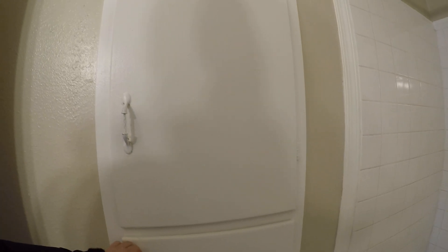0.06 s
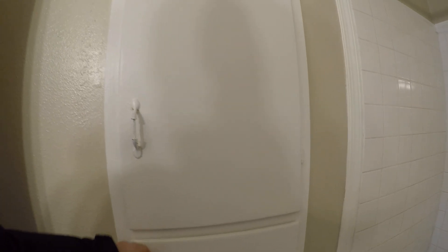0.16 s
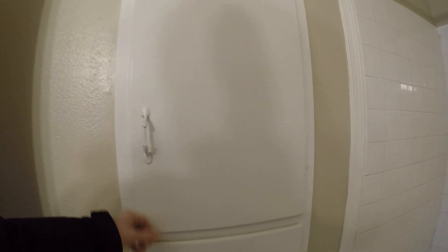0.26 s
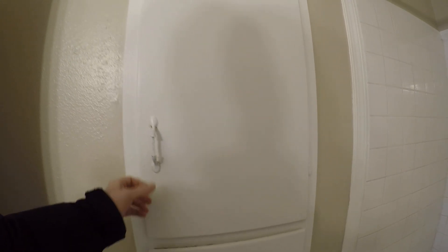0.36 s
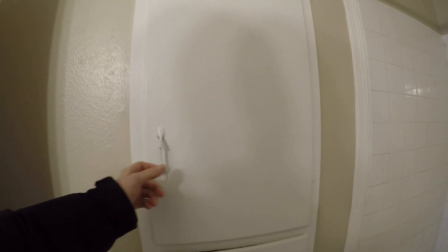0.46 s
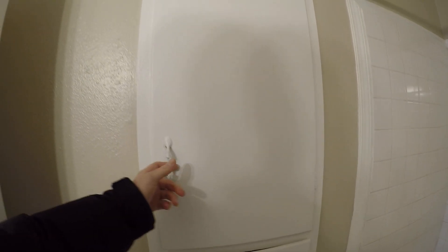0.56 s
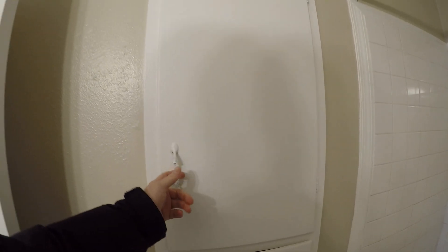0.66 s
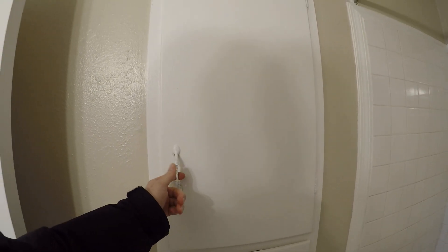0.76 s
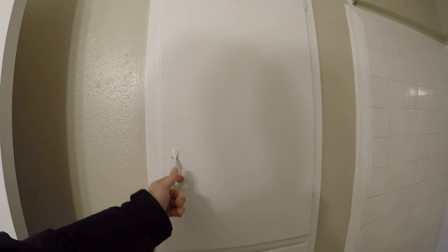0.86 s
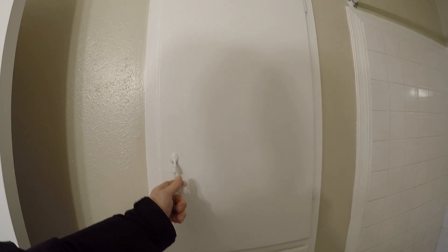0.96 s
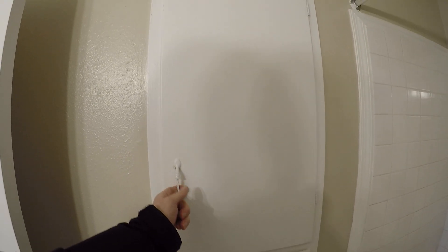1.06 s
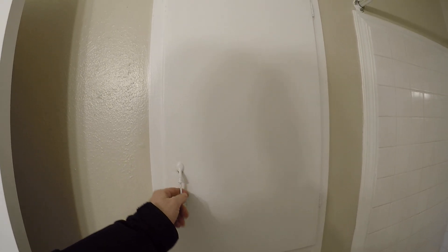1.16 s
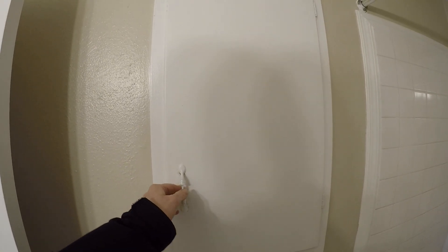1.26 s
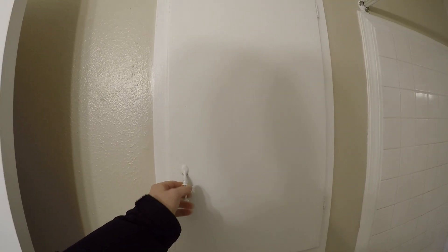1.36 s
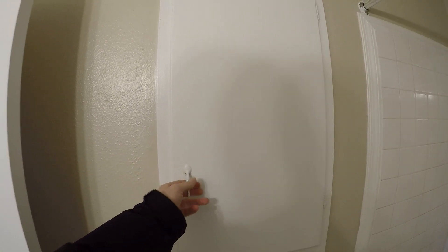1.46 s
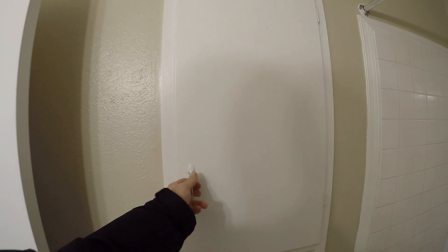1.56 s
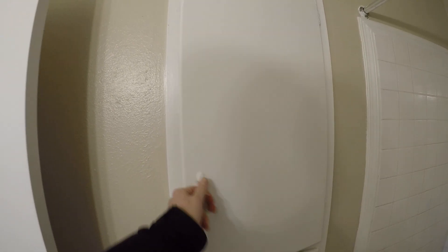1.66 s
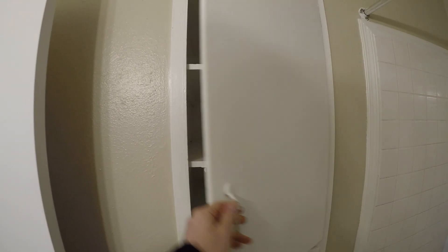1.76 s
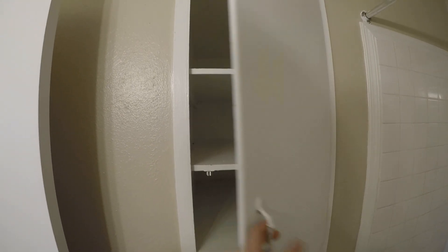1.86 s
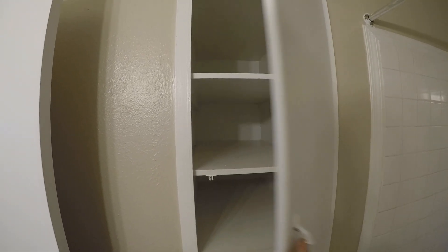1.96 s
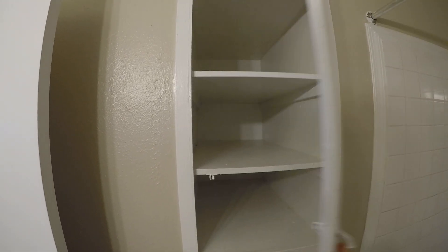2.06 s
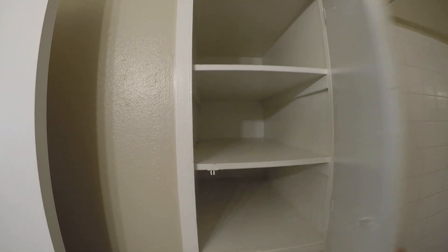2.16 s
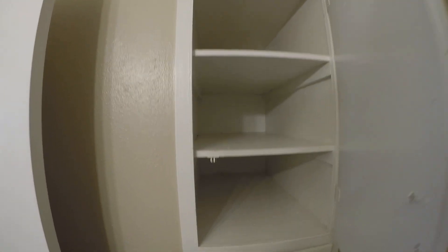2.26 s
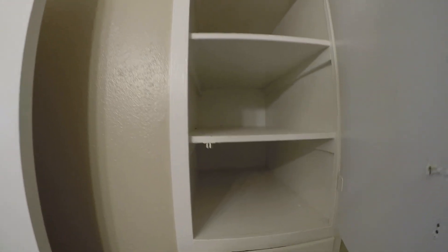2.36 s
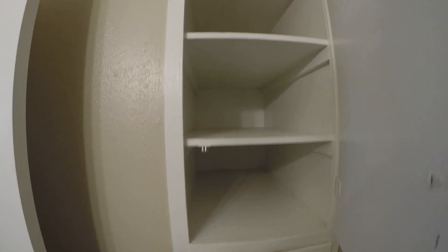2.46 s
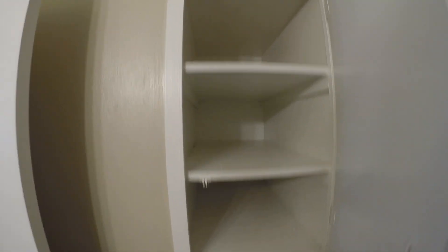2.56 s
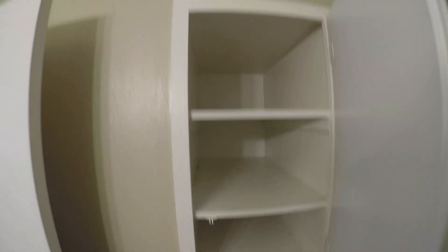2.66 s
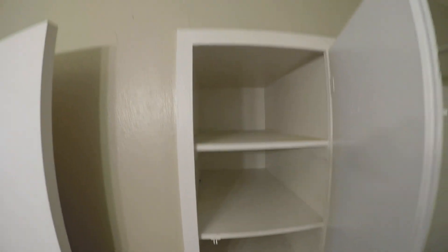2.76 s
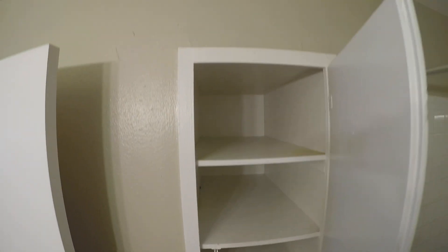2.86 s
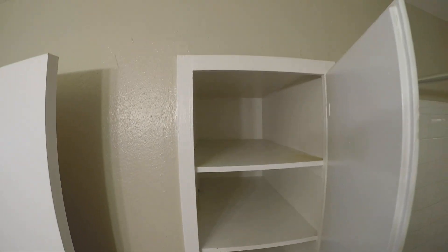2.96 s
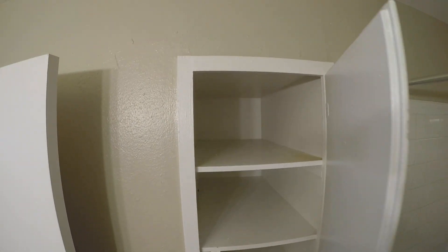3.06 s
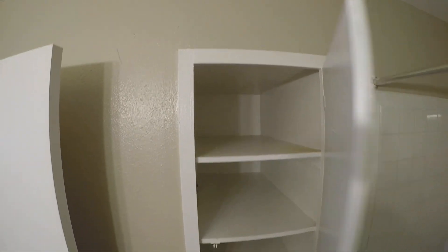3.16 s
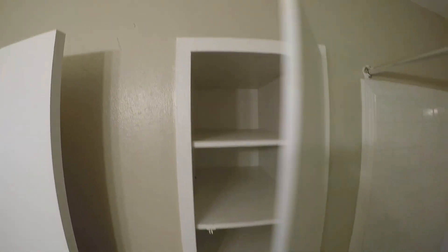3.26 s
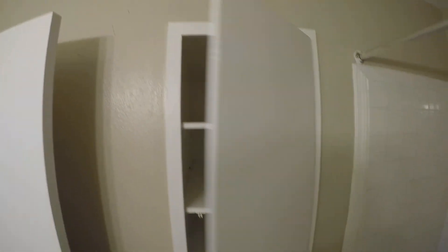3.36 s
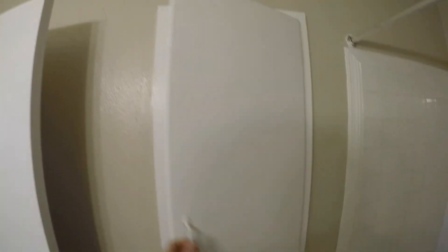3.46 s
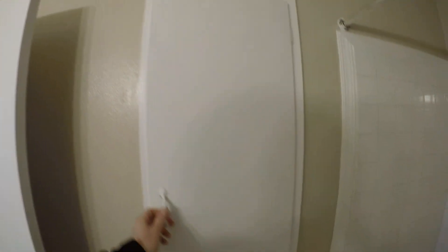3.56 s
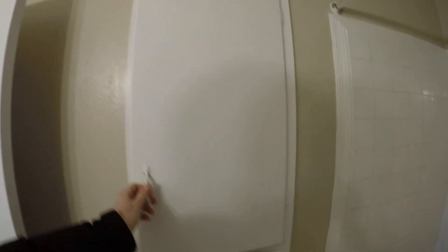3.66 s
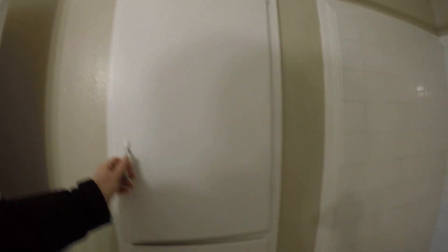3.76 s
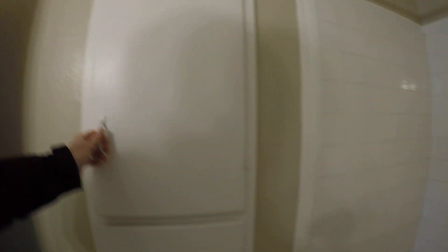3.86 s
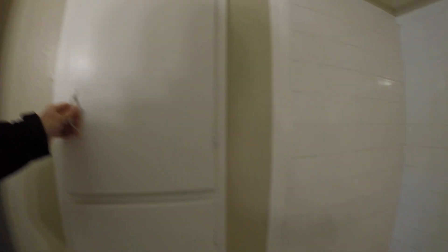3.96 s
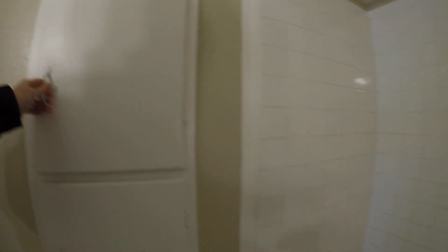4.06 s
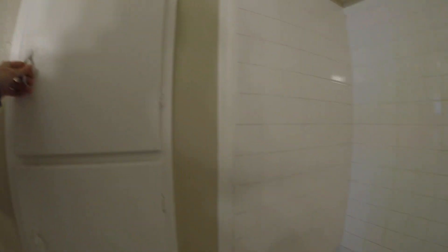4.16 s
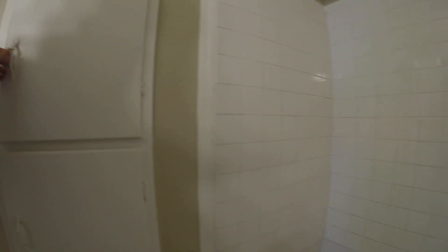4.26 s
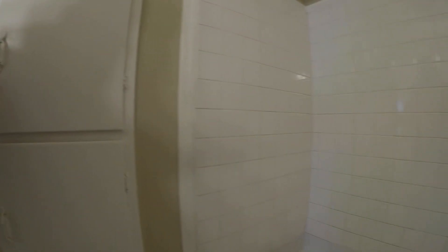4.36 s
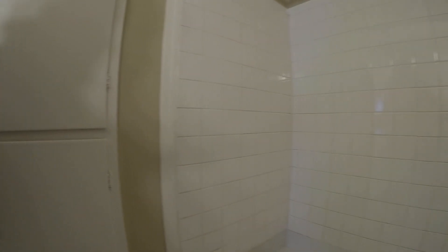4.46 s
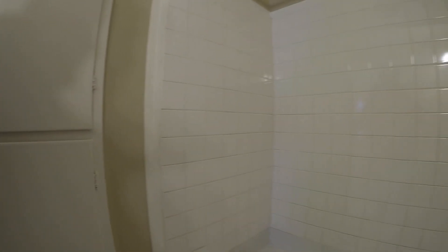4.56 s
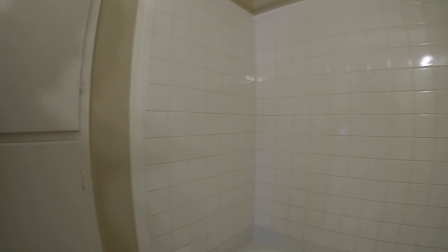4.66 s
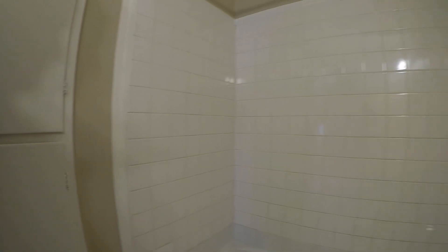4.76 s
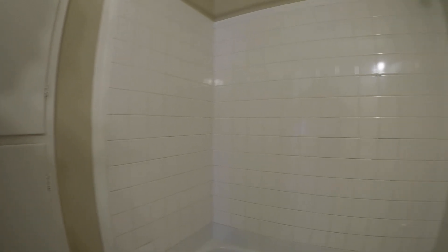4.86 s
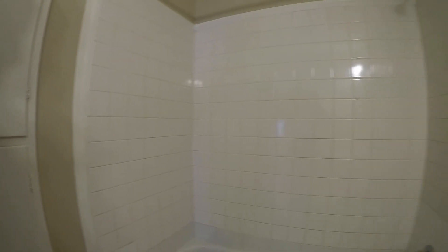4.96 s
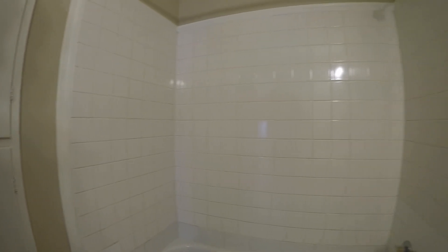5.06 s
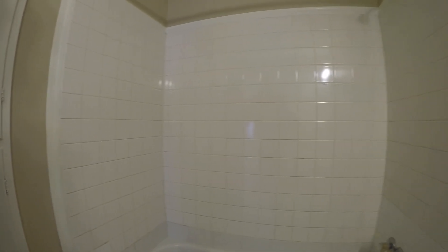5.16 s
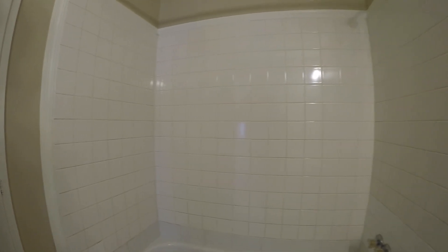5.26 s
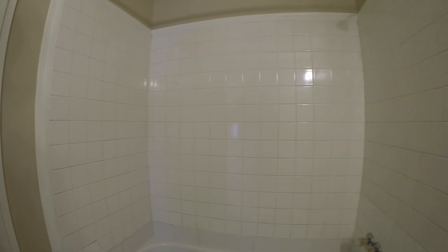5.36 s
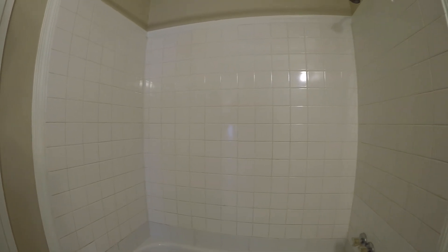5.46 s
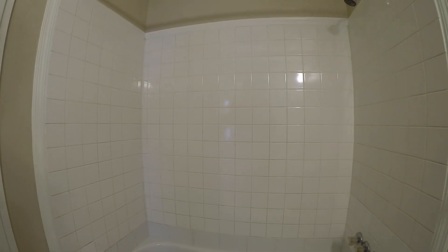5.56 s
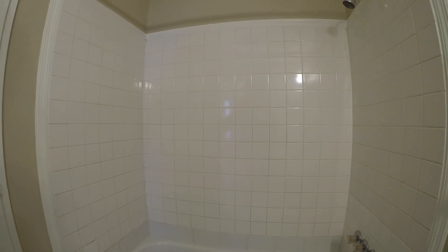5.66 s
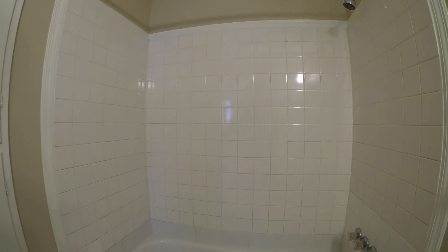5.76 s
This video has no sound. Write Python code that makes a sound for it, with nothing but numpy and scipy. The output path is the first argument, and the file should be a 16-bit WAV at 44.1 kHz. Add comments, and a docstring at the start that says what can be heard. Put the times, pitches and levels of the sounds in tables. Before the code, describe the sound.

A tight cabinet door is fumbled, snaps open, then shuts with a hollow wooden knock; footsteps thud in a small tiled bathroom.

```python
"""In a small tiled bathroom, a hand takes the handle of a painted wooden cabinet door and the tight catch snaps free.
The door swings open, is pushed shut with a hollow knock and settles in its catch. Struck bodies are sums of decaying
modes, each blow smoothed by its contact time; tile reflections, friction and rustle are coloured noise. Steps thud
on the floor, a sleeve rustles, and a body-worn camera ticks and rumbles as it moves, over faint room noise and a whine.
"""
import sys
import numpy as np
from scipy import signal
from scipy.fft import rfft, irfft
from scipy.io import wavfile

SR = 44100
rng = np.random.default_rng(int(sys.argv[2]) if len(sys.argv) > 2 else 0)


def dump_mix(stems):
    """Bounce the given channels to the path in sys.argv[1] as a 16-bit WAV at rate SR."""
    frames = np.atleast_2d(stems).T  # one column per channel
    limited = np.clip(frames, -1, 1)  # hard clip at full scale
    pcm = np.round(limited * 32767).astype(np.int16)
    wavfile.write(sys.argv[1], SR, pcm)


N = 256220  # length in samples
RING = np.arange(int(1.5 * SR)) / SR  # time axis of one struck sound, s

# All levels are relative gains in dB.
# Blows on the door: start_s, panel_thump_db, contact_ms, wood_clack_db, metal_catch_db
DOOR_BLOWS = [(1.565, -16.5, 1.85, -30, -38), (1.572, -22.5, 2.43, -58, -20.5), (1.586, -31, 2.9, -58, -22),
              (1.600, -23.5, 1.75, -43, -38), (1.619, -40.5, 0.62, -29.5, -57),
              (3.861, -34, 3.8, -52, -40.5), (3.912, -16.5, 2.86, -36.5, -47),
              (3.918, -24.5, 2.7, -33.5, -49), (3.932, -22, 3.4, -36, -53), (4.059, -53, 3.5, -38, -48)]
# Modes of the door panel and cabinet box: pitch_hz, level_db, t60_s
PANEL_MODES = [(27.54, 3.5, 2.38), (42.6, -4, 1), (71.7, 11, 0.41), (119.3, 6.5, 0.33), (145, 0, .58),
               (233, -1.5, .42), (280.7, -12.5, 0.72), (381, -7, 0.38), (408.2, -4, 0.393)]
# Modes of the door edge and frame: pitch_hz, level_db, t60_s
FRAME_MODES = [(626, -14.5, 0.52), (770, -8.5, 0.28), (830, -26, 0.28), (1650, -32, 0.24),
               (2020, -11, 0.39)]
# Modes of the metal catch: pitch_hz, level_db, t60_s
CATCH_MODES = [(1448, -11, .22), (1553, -15, .2), (2250, -16, .18)]
# Dense resonances of the box: pitch_hz, level_db
BOX_SPECTRUM = [(30, -16), (90, -15.5), (240, 2.5), (420, -11.5), (560, -32), (1000, -54)]
# Dense resonances of the wood: pitch_hz, level_db
WOOD_SPECTRUM = [(200, 15), (420, 8), (560, -4), (680, 8.5), (860, 13), (1100, -1), (1500, 9.5),
                 (2200, 2.5), (3200, -5), (6000, -9), (7500, -76), (11000, -54), (15000, -82)]
# Dense resonances of the metal: pitch_hz, level_db
METAL_SPECTRUM = [(400, -39), (1100, -10.5), (1500, 0.5), (2200, -3.5), (2900, -4), (4000, 2), (5000, 0),
                  (5900, 3), (6600, -2), (7400, -13), (8600, -12.5), (9800, -36), (12300, -22),
                  (15500, -54)]
# Click of the hinge: pitch_hz, level_db
HINGE_SPECTRUM = [(500, -2), (1500, 2.5), (3000, -17), (4500, 2), (6200, 6), (7500, -25), (15000, -30)]
SNAP_S, SNAP_DB = 1.5725, -27  # the catch lets go
HINGE_S, HINGE_DB = 2.467, -39  # the hinge clicks once when wide open

# Fingers on the handle: start_s, door_bump_db, metal_clink_db, sharp_tick_db
GRIPS = [(0.8006, -27.5, -39.5, -36), (0.811, -21, -53, -45), (0.95, -36, -56, -51),
         (1.21, -32.5, -66, -75), (1.232, -33, -52, -76), (1.252, -39, -58, -70)]
# Modes of the bumped door: pitch_hz, level_db, t60_s
BUMP_MODES = [(90.6, 1.5, 0.24), (115.4, 9, 0.09), (168, -3, 0.31), (219, -7.5, 0.51), (309, -17.5, 0.48),
              (400, -10.5, 0.17)]
# Modes of the handle: pitch_hz, level_db, t60_s
HANDLE_MODES = [(1990, -11, .3), (2110, -8, .4), (2300, -9, .2), (2480, -12, .15)]
# Sharp tick of the fingers, also of the catch snapping free: pitch_hz, level_db
TICK_SPECTRUM = [(1000, -25), (3000, -4), (6500, 0), (9000, -4), (13000, -3), (15500, -10)]

# Rubs of the door and handle, and a sole scuff at 3.625 s:
# peak_s, rise_s, fall_s (time constants), wood_db, metal_db
RUBS = [(0.823, 0.016, 0.047, -42.5, -46), (1.26, 0.028, 0.037, -45.5, -76),
        (1.568, 0.0061, 0.0088, -36.5, -25), (1.612, 0.015, 0.015, -32, -35),
        (3.625, 0.033, 0.054, -48, -54), (3.886, 0.015, 0.069, -42.5, -49), (4.085, 0.017, 0.042, -43, -68)]
# Scrape of the wood layer: pitch_hz, level_db
SCRAPE_SPECTRUM = [(500, -11.5), (850, 3), (1100, -13), (1600, 5), (2100, 2.5), (3300, -1), (6000, -44),
                   (9000, -59)]

# Footfalls, and at 4.9454 s the heel knock returning from the wall:
# start_s, floor_thud_db, heel_knock_db, sole_scuff_db, floor_ring_db
STEPS = [(0.472, -49, -33, -51, -32), (3.606, -24, -39, -70, -22), (4.568, -55, -47, -51, -30.5),
         (4.8939, -9, -18, -41.5, -40), (4.921, -12, -26, -51, -42), (4.9454, -50, -24, -76, -35),
         (5.525, -24.5, -37.5, -51, -21)]
# Modes of the floor boards: pitch_hz, level_db, t60_s
BOARD_MODES = [(36.6, 8.5, 0.095), (27.9, -0.5, 0.88)]
# Hollow ring under the heel: pitch_hz, level_db, t60_s
HEEL_MODES = [(138.3, -1.5, 0.49), (192.4, -3.5, 0.21), (238.7, 3.5, 0.49), (271, 1, 0.35),
              (304, -19, 0.29), (397, -30, 0.4), (386, -14.5, 0.79), (468, -22, 0.25)]
# Dense resonances of the floor: pitch_hz, level_db
FLOOR_SPECTRUM = [(60, -36.5), (150, -13.5), (230, 13), (330, -1.5), (430, -10.5), (560, -29), (1000, -48)]
# Scuff of the sole: pitch_hz, level_db
SOLE_SPECTRUM = [(100, -11), (330, -14), (570, 2), (850, 10), (1120, 0), (1600, 6.5), (2100, -7.5),
                 (2700, -7), (5000, -11), (12000, -48)]
FLOOR_RING_HZ = 140  # ring of the floor at a step

# Ticks of the camera case: start_s, tick_db, contact_ms, dry_click_db, mount_jolt_db
CASE_TICKS = [(0.2203, -32.5, 1.11, -37, -19), (0.493, -42, 1.7, -57, -17),
              (2.339, -37, 1.09, -42.5, -12.5), (2.663, -42, 1.43, -67, -24), (3.258, -38, 1.4, -64, -21.5),
              (3.491, -40, 1.96, -62, -16.5), (4.356, -36.5, 2.33, -60, -32)]
# Modes of the camera case: pitch_hz, level_db, t60_s
CASE_MODES = [(325, -1.5, 0.14), (412, 7, 0.12), (486, 9.5, 0.037), (825, 14, 0.0047), (1035, 2, 0.036),
              (1600, 12, 0.045), (2160, 27, 0.029)]
# Dry click of the case: pitch_hz, level_db
CLICK_SPECTRUM = [(500, -23), (2000, 27), (3200, 7), (6000, -28), (7500, -28), (15000, -23)]
# Soft jolts of the mount as the arm swings the door wide and back: start_s, level_db, pitch_hz
MOUNT_JOLTS = [(1.887, -19.5, 67.9), (2.065, -15.5, 59), (2.393, -17, 77.6), (2.525, -14.5, 67),
               (2.538, -23.5, 125), (2.579, -17.5, 105.8), (3.356, -27, 140)]
TICK_JOLT_LAG_S, TICK_JOLT_HZ = 0.0099, 68.9  # delay and ring of the mount after a tick
JOLT_T60_S = 0.28  # decay of the mount and of the floor ring

# Strokes of the arm: fastest_s, length_s (full width at half power), rustle_db
ARM_STROKES = [(0.42, 0.27, -53), (1.0, 0.32, -54.5), (1.39, 0.17, -56.5), (2.053, 0.52, -51.5),
               (2.688, 0.25, -51.5), (3.256, 0.15, -52.5), (3.7, 0.92, -57), (4.3, 0.17, -54),
               (4.772, 0.33, -59.5), (5.417, 0.12, -48), (5.783, 0.6, -55.5)]
# Quick brushes of the cuff: start_s, level_db
CUFF_BRUSHES = [(0.146, -43), (0.184, -59), (5.333, -50.5), (5.418, -49), (5.755, -49)]
# Rustle of the sleeve: pitch_hz, level_db
SLEEVE_SPECTRUM = [(300, -31), (1000, -9), (1900, -5), (3000, -7.5), (4500, -4), (6100, -1.5), (7200, -17),
                   (9500, -15), (12000, -31), (15000, -82)]
# Brush of the cuff: pitch_hz, level_db
BRUSH_SPECTRUM = [(1000, -8.5), (3000, -10), (4800, -2), (6100, 1.5), (7500, -15.5), (13000, -30)]
SLEEVE_REST_DB = -61.5

# Leans and shifts of weight: peak_s, rumble_db
LEANS = [(0.06, -18.5), (1.72, -17), (2.52, -24), (3.4, -33), (4.148, -31), (5.1, -26), (5.57, -25)]
# Rumble of the swaying camera: pitch_hz, level_db
SWAY_SPECTRUM = [(12, -2), (27, 6), (50, -3), (100, -21.5), (200, -28), (500, -73.5)]
LEAN_RISE_S, LEAN_FALL_S = 0.077, 0.18  # time constants
STANDING_DB = -38.5  # sway of a body at rest

# Reverberation of the tiled room: pitch_hz, t60_s
ROOM_DECAY = [(100, .65), (300, .55), (700, .42), (2000, .5), (5500, .5), (9500, .36), (13000, .22)]
# Room and microphone noise: pitch_hz, level_db
AIR_SPECTRUM = [(25, 0.5), (75, 5), (160, -5), (240, -11), (330, -14), (410, -13), (560, -31.5), (800, -23),
                (1200, -30.5), (1800, -27), (3000, -36.5), (6100, -30), (7300, -37.5), (9500, -33.5),
                (12000, -42.5), (15000, -49)]
AIR_DB = -40.5
WHINE_HZ, WHINE_DB = 1001, -66
WHINE_FROM_S, WHINE_TO_S, WHINE_FADE_S = 2.5, 5.7, 0.3
TOP_HZ = 15300  # upper limit of the recorder


def door():
    """Modal excitation: each blow thumps the panel, clacks wood on wood and rattles the metal catch."""
    out = np.zeros(N)
    panel, frame, catch = ring(PANEL_MODES), ring(FRAME_MODES), ring(CATCH_MODES)
    for start_s, thump_db, contact_ms, wood_db, metal_db in DOOR_BLOWS:
        box = panel + undb(-5.5) * room(BOX_SPECTRUM, direct_db=7.5, direct_t60=0.16)
        wood = frame + room(WOOD_SPECTRUM, direct_db=7.5, direct_t60=0.071)
        metal = catch + room(METAL_SPECTRUM, direct_db=16.5, direct_t60=0.0014)
        add(out, start_s, undb(thump_db) * soften(box, contact_ms))
        add(out, start_s, undb(wood_db) * wood + undb(metal_db) * metal)
    add(out, SNAP_S, undb(SNAP_DB) * click(TICK_SPECTRUM, t60=0.009))
    add(out, HINGE_S, undb(HINGE_DB) * click(HINGE_SPECTRUM, t60=0.022))
    return out


def handle():
    """Impact on coupled bodies: fingers bump the still shut door and make its handle clink."""
    out = np.zeros(N)
    bump = soften(ring(BUMP_MODES), contact_ms=2.4)
    metal = ring(HANDLE_MODES)
    for start_s, bump_db, clink_db, tick_db in GRIPS:
        clink = metal + room(METAL_SPECTRUM, direct_db=-8, direct_t60=0.015)
        tick = click(TICK_SPECTRUM, t60=0.013)
        add(out, start_s, undb(bump_db) * bump + undb(clink_db) * clink + undb(tick_db) * tick)
    return out


def rubs():
    """Friction: brief scrapes as fingers work the handle, the door moves and seats, and a sole slides."""
    out = np.zeros(N)
    wood = friction(SCRAPE_SPECTRUM, grain_db=3.5, grain_hz=400)
    metal = friction(METAL_SPECTRUM, grain_db=3, grain_hz=600)
    for peak_s, rise_s, fall_s, wood_db, metal_db in RUBS:
        scrape = undb(wood_db) * wood + undb(metal_db) * metal
        out += swell(peak_s, rise_s, fall_s) * scrape
    return out


def steps():
    """Floor impact: weight bends the boards, the heel knocks, the sole scuffs and the floor rings."""
    out = np.zeros(N)
    boards = soften(ring(BOARD_MODES), contact_ms=12.4)
    heel = above(ring(HEEL_MODES), hz=165)
    for start_s, thud_db, heel_db, scuff_db, floor_ring_db in STEPS:
        # the scuff arrives mostly by way of the walls
        scuff = room(SOLE_SPECTRUM, direct_db=-10, direct_t60=0.04)
        floor = undb(-4.0) * room(FLOOR_SPECTRUM, direct_db=11.5, direct_t60=0.082)
        knock = soften(heel + floor, contact_ms=2.35)
        add(out, start_s, undb(thud_db) * boards + undb(heel_db) * knock + undb(scuff_db) * scuff)
        add(out, start_s, undb(floor_ring_db) * jolt(FLOOR_RING_HZ))
    return out


def camera():
    """Structure-borne sound: ticks and jolts travel through the case without room; ticks rock the mount."""
    out = np.zeros(N)
    case = above(ring(CASE_MODES), hz=317)
    for start_s, tick_db, contact_ms, click_db, jolt_db in CASE_TICKS:
        dry_click = click(CLICK_SPECTRUM, t60=0.046)
        add(out, start_s, undb(tick_db) * soften(case, contact_ms) + undb(click_db) * dry_click)
        add(out, start_s + TICK_JOLT_LAG_S, undb(jolt_db) * jolt(TICK_JOLT_HZ))
    for start_s, level_db, pitch_hz in MOUNT_JOLTS:
        add(out, start_s, undb(level_db) * jolt(pitch_hz))
    return out


def sleeve():
    """Cloth friction: rustle follows the speed of each arm stroke, and now and then the cuff brushes the coat."""
    t = np.arange(N) / SR
    power = np.full(N, undb(SLEEVE_REST_DB) ** 2)
    for fastest_s, length_s, rustle_db in ARM_STROKES:
        bell = 0.5 ** ((2 * (t - fastest_s) / length_s) ** 2)
        power += undb(rustle_db) ** 2 * bell
    out = friction(SLEEVE_SPECTRUM, grain_db=1.0, grain_hz=91.7) * np.sqrt(power)
    for start_s, level_db in CUFF_BRUSHES:
        add(out, start_s, undb(level_db) * room(BRUSH_SPECTRUM, direct_db=-6, direct_t60=0.03))
    return out


def sway():
    """Motion-driven rumble: each shift of weight sways the camera, then it settles back to standing still."""
    effort = np.full(N, undb(STANDING_DB))
    for peak_s, rumble_db in LEANS:
        effort += undb(rumble_db) * swell(peak_s, LEAN_RISE_S, LEAN_FALL_S)
    return colour(rng.standard_normal(N), SWAY_SPECTRUM) * effort


def background():
    """Stationary noise and a pure tone: quiet rumble, hiss and a faint electrical whine that fades in and out."""
    t = np.arange(N) / SR
    nearest_end_s = np.minimum(t - WHINE_FROM_S, WHINE_TO_S - t)
    heard = np.clip(nearest_end_s / WHINE_FADE_S, 0, 1)
    whine = np.sqrt(2) * np.sin(2 * np.pi * WHINE_HZ * t)  # unit RMS
    air = colour(rng.standard_normal(N), AIR_SPECTRUM)
    return undb(AIR_DB) * air + undb(WHINE_DB) * heard * whine


def ring(modes):
    """Modal superposition: a struck body rings freely as a sum of decaying sines."""
    return sum(undb(db) * fade(t60) * np.sin(2 * np.pi * hz * RING) for hz, db, t60 in modes)


def fade(t60):
    """Exponential damping: the amplitude is 60 dB down after t60 seconds."""
    return np.exp(-np.log(1000) * RING / t60)


def soften(x, contact_ms):
    """Contact time: a longer contact spreads the push and leaves the high modes quiet."""
    width = contact_ms * SR / 1000
    phase = (np.arange(int(width) + 1) + 0.5) / width
    push = np.sin(np.pi * np.minimum(phase, 1)) ** 2
    return signal.oaconvolve(x, push / push.sum())[:len(x)]


def jolt(hz):
    """Mass on a spring: one damped mode, softly pushed, for the camera mount and for the floor."""
    return soften(ring([(hz, 0, JOLT_T60_S)]), contact_ms=3.6)


def above(x, hz):
    """Radiation limit: a small body radiates little below its lowest mode."""
    return signal.sosfilt(signal.butter(2, hz, "high", fs=SR, output="sos"), x)


def click(points, t60):
    """Impulsive noise: a short dry burst of decaying noise, then coloured."""
    return colour(rng.standard_normal(len(RING)) * fade(t60), points)


def friction(points, grain_db, grain_hz):
    """Stick and slip: surfaces catch and slip in small uneven grains."""
    slips = np.interp(np.arange(N) * grain_hz / SR, np.arange(N), rng.standard_normal(N))
    return colour(rng.standard_normal(N) * undb(grain_db * slips), points)


def swell(peak_s, rise_s, fall_s):
    """Exponential envelope: rise to a peak at peak_s, then fall."""
    t = np.arange(N) / SR
    return np.exp(-np.maximum((peak_s - t) / rise_s, (t - peak_s) / fall_s))


def room(points, direct_db, direct_t60):
    """Reverberation: a direct crack plus dense tile reflections with a decay time for each band."""
    spectrum = rfft(rng.standard_normal(len(RING)))
    tail = 0
    for centre, t60 in ROOM_DECAY:
        # overlapping triangular bands on a logarithmic axis
        band = on_log_axis([(hz, float(hz == centre)) for hz, _ in ROOM_DECAY], len(RING))
        tail = tail + irfft(spectrum * band, len(RING)) * fade(t60)
    crack = undb(direct_db) * fade(direct_t60) * rng.standard_normal(len(RING))
    return colour(tail + crack, points)


def colour(x, points, size=4096):
    """Minimum-phase filtering: causal, with the given spectral shape; white noise keeps its power."""
    cepstrum = irfft(np.log(undb(on_log_axis(points, size))))
    cepstrum[1:size // 2] *= 2  # fold the cepstrum to positive time
    cepstrum[size // 2 + 1:] = 0
    response = irfft(np.exp(rfft(cepstrum)))
    return signal.oaconvolve(x, response / np.linalg.norm(response))[:len(x)]


def on_log_axis(points, size):
    """Logarithmic frequency: interpolate (Hz, value) points at the bins of a transform."""
    hz, value = np.transpose(points)
    bins_hz = np.maximum(np.arange(size // 2 + 1) * SR / size, 1)
    return np.interp(np.log(bins_hz), np.log(hz), value)


def undb(db):
    """Level to amplitude: decibels become gain."""
    return 10 ** (np.asarray(db) / 20)


def add(track, start_s, sound):
    """Linear superposition: mix a sound into the track at start_s."""
    start = max(int(start_s * SR), 0)
    track[start:start + len(sound)] += sound[:N - start]


def scene():
    """Superposition of all sources at one microphone."""
    contact = door() + handle() + rubs() + steps()
    wearer = camera() + sleeve() + sway()
    return (contact + wearer + background())[None]


def record(dry):
    """Band limits and saturation: block the deepest rumble, round peaks near full scale, cut the top."""
    x = signal.sosfilt(signal.butter(1, 10, "high", fs=SR, output="sos"), dry)
    rounded = x / (1 + x ** 8) ** (1 / 8)
    return signal.sosfilt(signal.ellip(8, 0.2, 70, TOP_HZ, fs=SR, output="sos"), rounded)


dry = scene()
out = record(dry)
dump_mix(out)
```